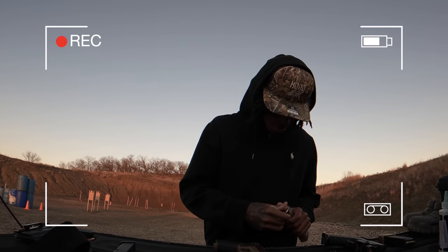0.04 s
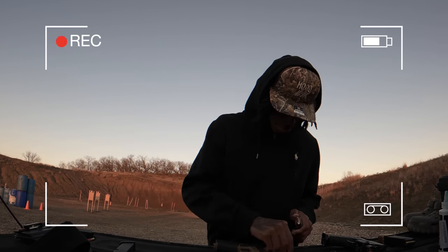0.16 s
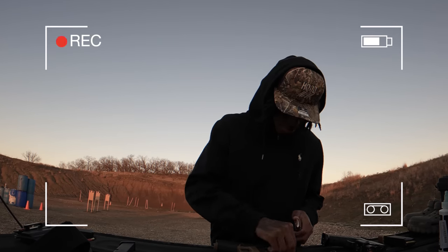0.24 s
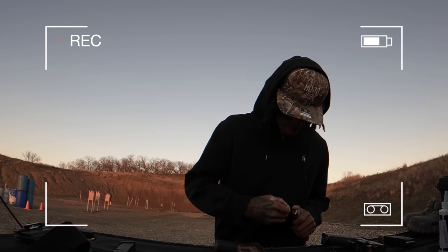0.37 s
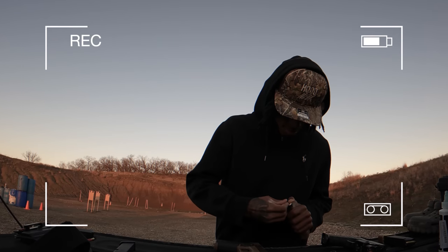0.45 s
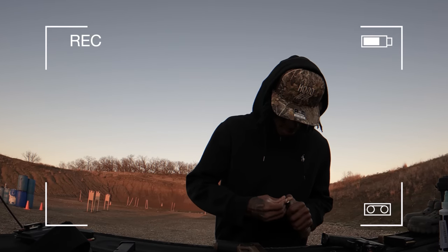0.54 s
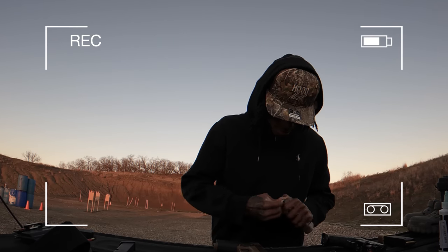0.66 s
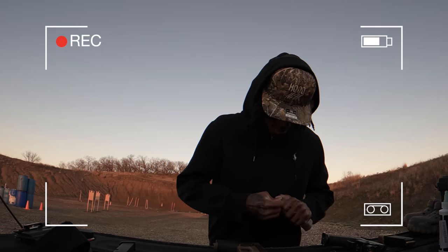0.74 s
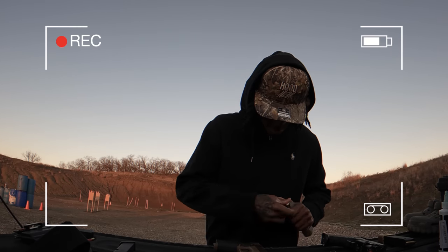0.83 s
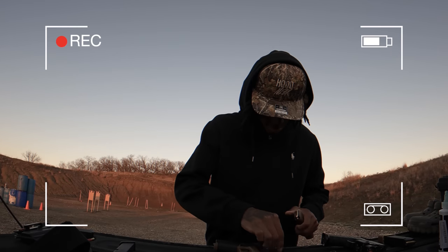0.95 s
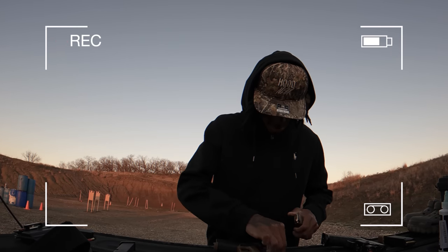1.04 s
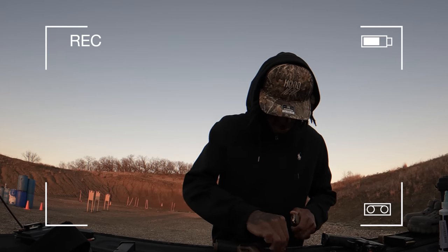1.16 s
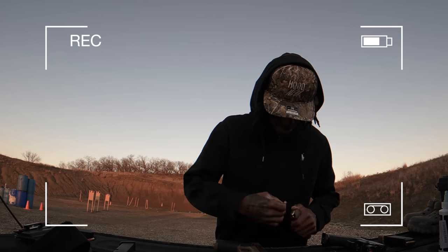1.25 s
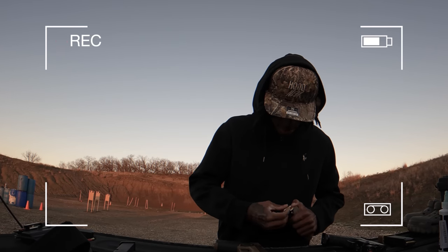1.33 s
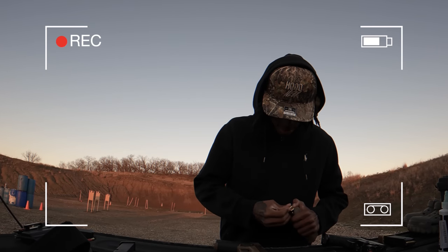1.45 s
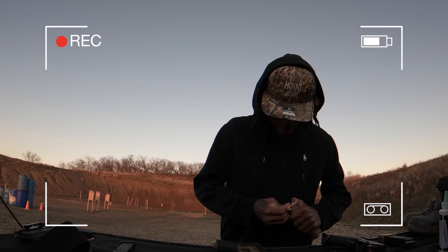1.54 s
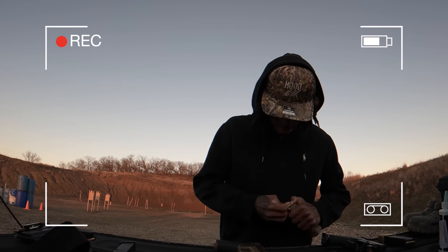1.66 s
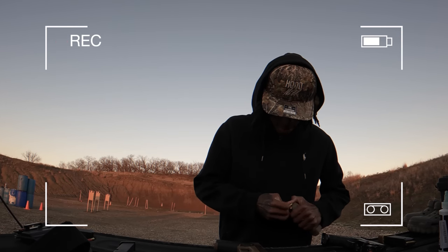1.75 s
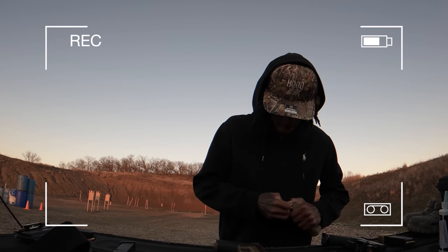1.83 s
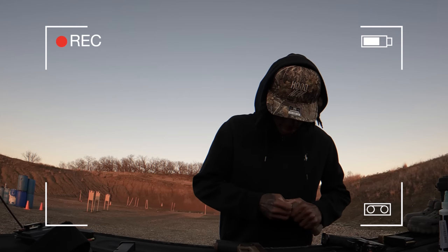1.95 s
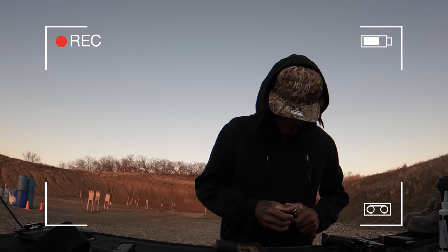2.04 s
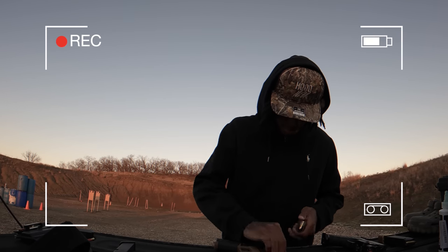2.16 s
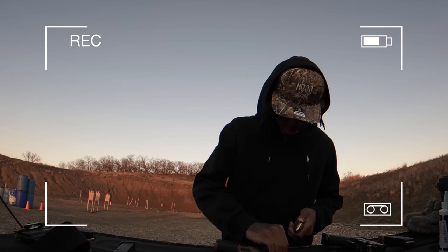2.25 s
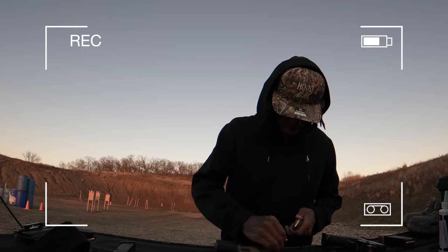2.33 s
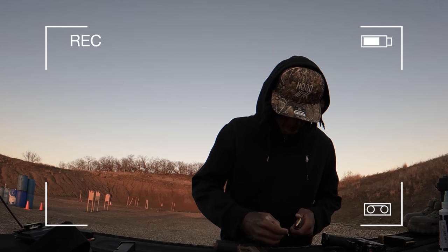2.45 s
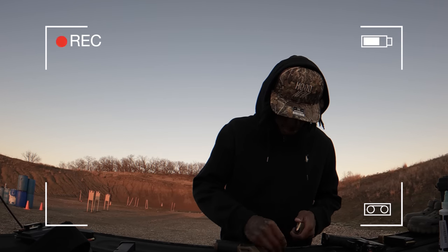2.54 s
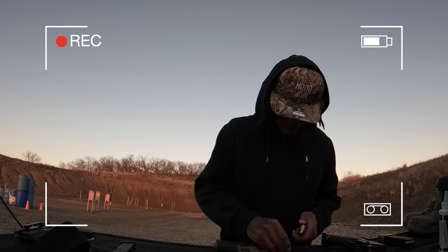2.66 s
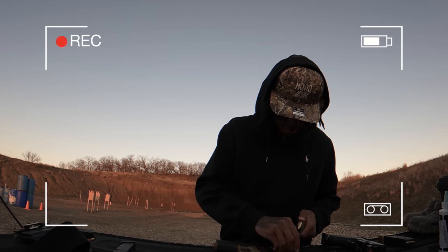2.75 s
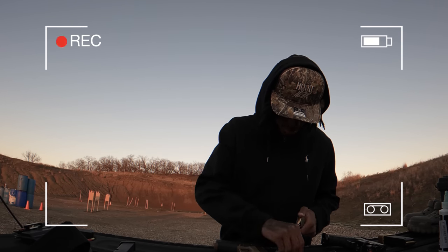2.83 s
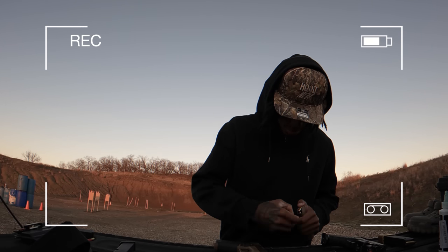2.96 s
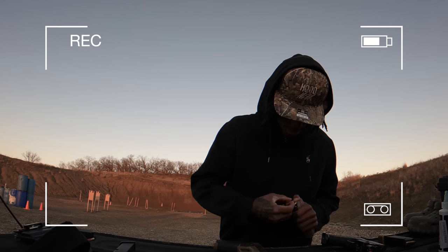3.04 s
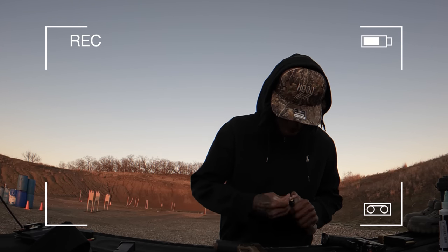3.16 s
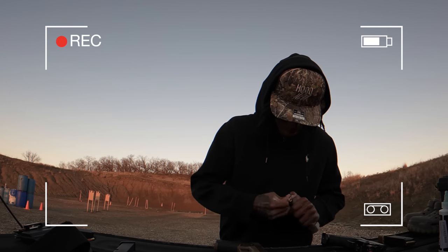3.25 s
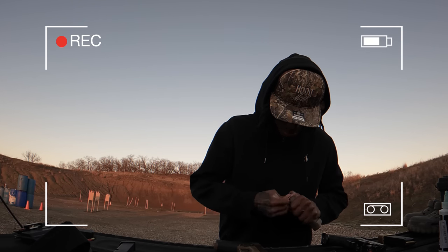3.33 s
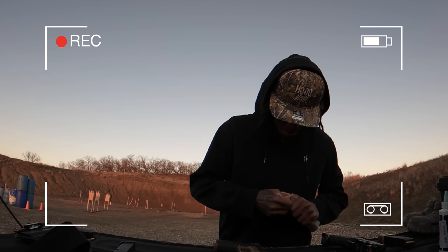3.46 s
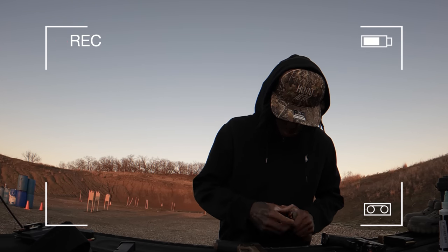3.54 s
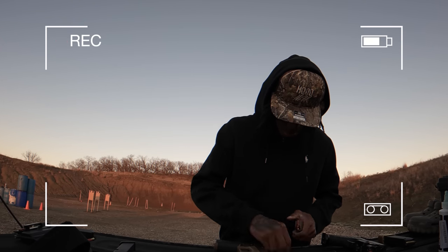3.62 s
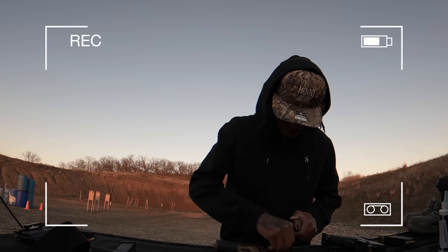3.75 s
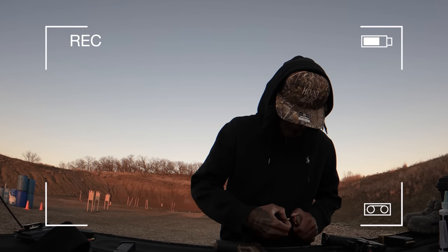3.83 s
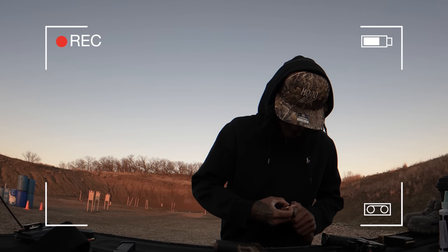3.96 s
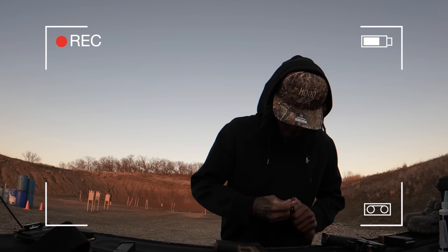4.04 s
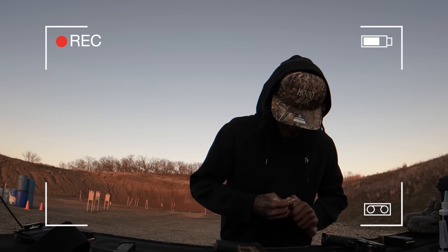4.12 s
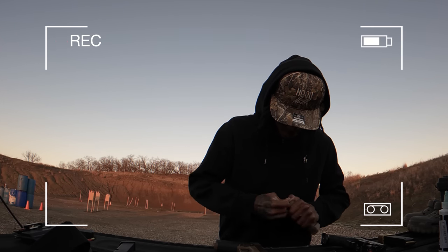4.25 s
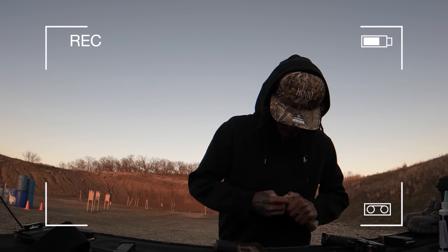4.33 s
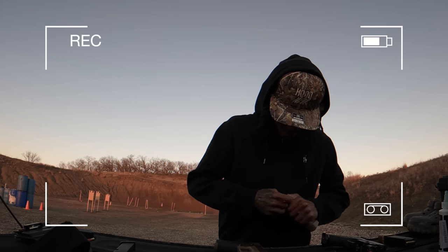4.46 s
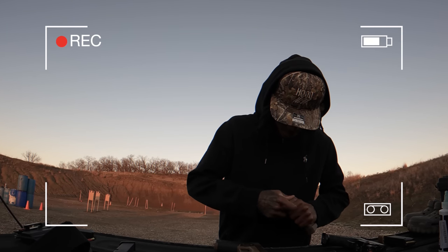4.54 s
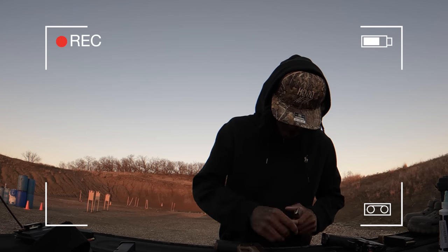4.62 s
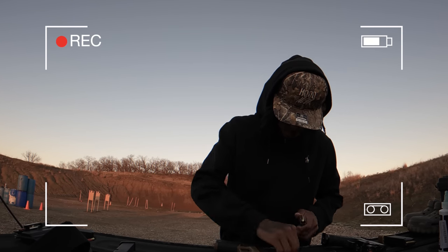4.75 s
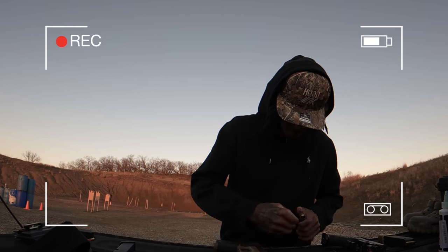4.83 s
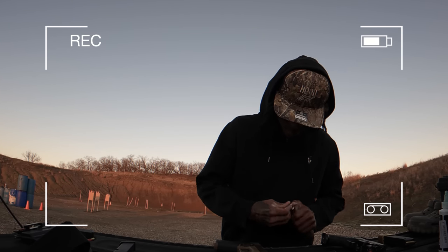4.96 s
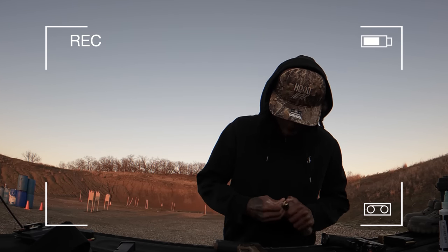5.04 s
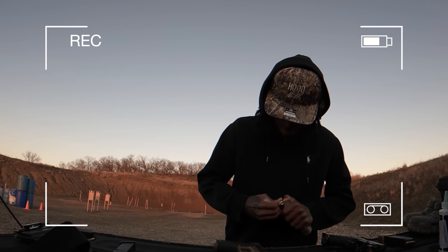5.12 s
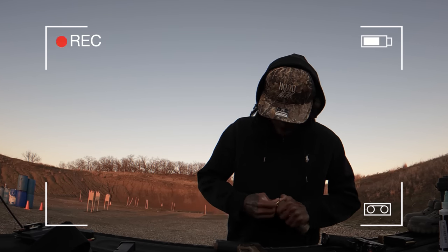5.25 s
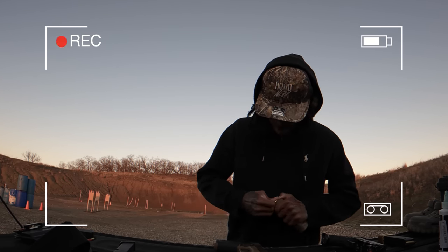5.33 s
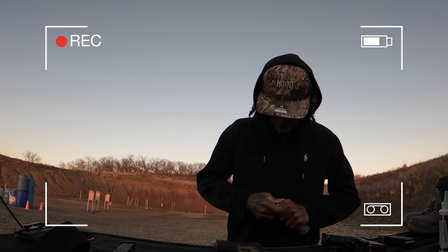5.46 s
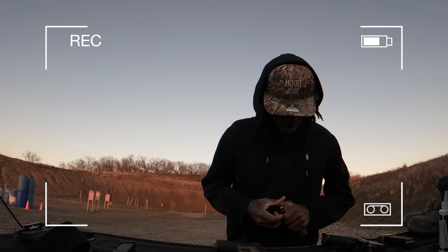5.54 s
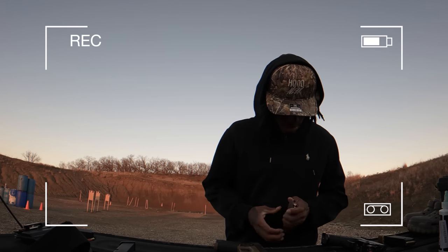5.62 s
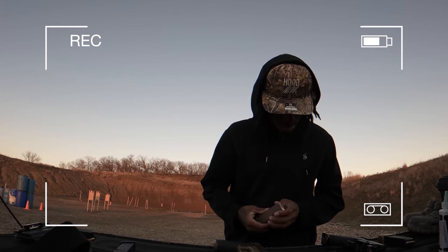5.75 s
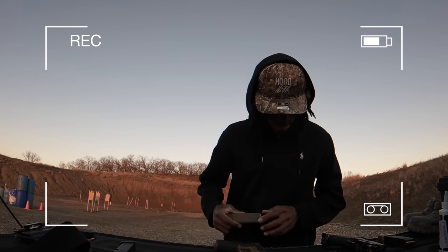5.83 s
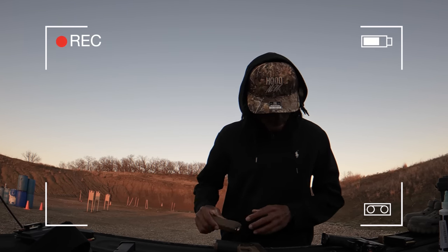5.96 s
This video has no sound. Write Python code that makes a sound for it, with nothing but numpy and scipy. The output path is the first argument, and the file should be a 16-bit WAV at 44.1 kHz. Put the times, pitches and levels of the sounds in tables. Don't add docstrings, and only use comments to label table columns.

```python
import sys
import numpy as np
from scipy import signal
from scipy.fft import rfft, irfft
from scipy.io import wavfile
from scipy.ndimage import uniform_filter1d

SR = 44100
rng = np.random.default_rng(int(sys.argv[2]) if len(sys.argv) > 2 else 0)


def voltage_ratio(decibels):
    exponent = np.asarray(decibels, float) / 20
    return 10 ** exponent


def materialize(psi):
    bounded = np.clip(np.atleast_2d(psi).T, -1, 1)
    quanta = np.round(bounded * 32767).astype(np.int16)
    wavfile.write(sys.argv[1], SR, quanta)


N = 264024

# [f/Hz, density/dB]
AIR_SPECTRUM = [(15, -1.5), (40, -5.5), (80, -4), (120, -11), (190, -19.5), (300, -20), (420, -31.5),
                (560, -42), (1000, -49), (1600, -56), (3000, -61.5), (7700, -70.5), (8300, -78),
                (15000, -93.5)]
AIR_DB = -46.5
# [arrival t/s, level/dB, stay/s]
CAR_PASSES = [
    (0.0, -71.5, 0.019),
    (0.4, -66.5, 0.14),
    (.98, -77, .1),
    (1.37, -77.5, 0.27),
    (1.95, -70, 0.031),
    (2.4, -78.5, 0.31),
    (3.35, -77.5, 0.32),
    (4.05, -68, 0.34),
    (5.35, -79.5, 0.095),
]
SWISH_RISE_DB_S, SWISH_FALL_DB_S, SWISH_FLOOR_DB = 216, 44, -89.5
# [f/Hz, density/dB]
TYRE_SPECTRUM = [(350, -37.5), (560, -5.5), (720, 2), (950, -3.5), (1300, -12), (1700, -20.5), (3000, -41),
                 (15000, -80.5)]
# [t/s, firing f/Hz, level/dB, upper orders above their mean/dB]
ENGINE_COURSE = [(0, 76.33, -54, 0), (.5, 76.52, -50.5, -2.5), (1, 75.94, -53.5, -4.5),
                 (1.599, 77.14, -55, -8), (2.299, 77.55, -61, 4), (2.999, 78.44, -65, 6.5),
                 (3.701, 77.9, -60, 2), (4.3, 77.68, -60.5, 6), (5., 78.08, -52.5, -2.5),
                 (5.5, 78.48, -54.5, 0.5), (5.99, 76.3, -55.5, -7)]
ENGINE_ORDERS_DB = [0.5, -7, 1, -7]
# [start t/s, end t/s]
CRICKET_PHRASES = [(0, .215), (.33, 1.02), (1.17, 1.48), (1.57, 2.09), (2.2, 2.47), (2.665, 2.9),
                   (3.0, 3.3), (3.43, 3.975), (4.08, 4.575), (4.665, 4.95), (5.03, 5.36), (5.46, 5.93)]
CRICKET_DB = -79.5
BANKS_DB, BANKS_T60_S = -26.5, 0.22
# [busiest t/s, level/dB]
FINGER_RUSTLES = [
    (0.78, -75.5),
    (2.08, -78.5),
    (2.269, -91),
    (3.57, -80),
    (4.671, -89.5),
    (5.45, -86),
    (5.9, -83.5),
]
RUSTLE_RISE_DB_S, RUSTLE_FALL_DB_S, RUSTLE_FLOOR_DB = 39, 42, -93
# [arrival t/s, level/dB, stay/s]
BOARD_SCUFFS = [(.25, -49, 0.1), (.33, -52, 0.044), (.69, -67, 0.009), (1.11, -51, 0.037),
                (1.17, -48.5, 0.056), (1.33, -58, 0.016), (1.4, -61, 0.025), (1.49, -62.5, 0.038),
                (1.56, -61, 0.062), (1.64, -69.5, 0.017), (1.76, -68, 0.013), (1.94, -61, .04),
                (2.215, -49, 0.075), (2.6, -44, 0.054), (2.7, -67, 0.068), (2.875, -47, 0.049),
                (2.95, -64.5, 0.011), (3.71, -47.5, 0.033), (4.765, -55, 0.023), (4.81, -62.5, 0.016)]
SCUFF_RISE_DB_S, SCUFF_FALL_DB_S, SCUFF_FLOOR_DB = 1196, 356.5, -100
# [f/Hz, density/dB]
SCUFF_SPECTRUM = [(200, -11), (400, 7), (700, 0.5), (1100, -7.5), (1600, -21), (2400, -24.5), (4000, -34),
                  (7000, -45.5), (15000, -81)]
# [t/s, thud/dB, panel above thud/dB, loose rounds above thud/dB, thud f/Hz]
BOX_KNOCKS = [(0.232, -24.5, -8, -25, 177), (0.247, -36.5, 10.5, -6, 236), (0.259, -26, -4, -13.5, 183),
              (0.294, -30.5, -2, -18, 198), (1.096, -26.5, -13.5, -25, 191), (1.118, -36.5, 3, -17, 290),
              (1.15, -31.5, 8, -4, 350), (1.16, -20, -1.5, -17, 210), (1.199, -33, 3, -30, 190),
              (2.207, -25.5, -11, -21.5, 290), (2.245, -30, -6.5, -25, 227), (2.266, -29, -2, -26, 166),
              (2.583, -12.5, -0.5, -0.5, 200), (2.591, -14.5, 3, -13, 330), (2.611, -27.5, 4, -34, 418),
              (2.621, -26, 1.5, -20, 400), (2.634, -27, 8.5, -14, 193), (2.651, -37, 2.5, -24, 300),
              (2.859, -34.5, -12, -28, 244), (2.866, -22, -5.5, -16.5, 169.7),
              (2.903, -35.5, -2.5, -14.5, 171), (3.701, -28.5, -1.5, -21.5, 202.9),
              (3.725, -32, -4, -16.5, 194), (3.739, -37, -0.5, -24, 182), (4.752, -29.5, -11, -18, 172),
              (4.764, -20.5, -8, -21, 258), (4.772, -24, -5.5, -23, 324)]
# [t/s, thud/dB, loose rounds above thud/dB, thud f/Hz]
BENCH_NUDGES = [(0.335, -32, -25, 369), (0.364, -32, -31, 305), (1.22, -34, -28, 300),
                (1.318, -34.5, -30, 300), (1.38, -32.5, -43, 194), (1.482, -40, -48, 300),
                (1.542, -43, -36, 230), (1.586, -40, -32, 222), (1.636, -42.5, -19, 148),
                (1.753, -42, -35, 290), (1.951, -42.5, -12, 152), (2.957, -40.5, -47, 236.6),
                (4.799, -48.5, -22, 208)]
NUDGE_PANEL_DB = -12
# [f/Hz, level/dB, t60/s]
BENCH_MODES = [(171, -5.5, 0.059), (200, -3, 0.11), (269, -3, 0.054), (300, -6.5, 0.1), (391, -7, 0.08)]
# [f/Hz, level/dB, t60/s]
PANEL_MODES = [(473, 7, 0.083), (560, 8.5, 0.16), (618, 9.5, 0.085), (720, 7.5, 0.069), (802, 9.5, 0.14),
               (873, 5.5, 0.03), (991, 3, .13), (1167, -1, .12), (1293, -8.5, .12), (1473, -6, 0.33),
               (1634, -16.5, 0.039), (1970, -9, 0.033), (2230, -7, .09), (2430, -7.5, .09)]
PANEL_DAMPING = 0.45
PANEL_SCATTER_DB, PANEL_DETUNE = 2.2, 0.02
# [f/Hz, density/dB]
ROUNDS_SPECTRUM = [(500, -24), (1300, 4), (2300, -4), (3300, -5), (4200, -14.5), (6000, -11), (7600, -18.5),
                   (8500, -39), (12000, -55), (15000, -58)]
RATTLE_S = 0.013
# [f/Hz, level/dB, t60/s]
MAGAZINE_MODES = [(1950, -15, 0.016), (2450, -12, 0.015), (3140, -10, 0.015), (4400, -14, 0.008),
                  (5450, -5.5, 0.0056), (6760, -13, 0.012)]
# [f/Hz, density/dB]
SCRAPE_SPECTRUM = [(1200, -24.5), (2000, -11.5), (3000, 4), (5000, 13.5), (7000, 4.5), (8500, -7),
                   (15000, -56)]
# [t/s, peak/dB, strongest ring f/Hz, shell knock/dB, edge/dB]
LIP_SNAPS = [(0.0114, -32, 2780, -17.5, -25), (0.0388, -35.5, 4900, -14.5, -11.5),
             (0.5347, -43.5, 1960, -17.5, -36), (0.6315, -39.5, 5530, -19.5, -24),
             (0.8116, -34, 5300, -33, -7.5), (0.815, -33, 3200, -27, -11), (0.8234, -37, 2070, -14.5, -18),
             (0.9088, -38, 4540, -9.5, -8.5), (1.1508, -37, 2380, -3, -11.5), (1.39, -62, 1970, -15, -29),
             (1.4077, -43, 4900, -21, -16), (1.41, -48, 1960, -17, -25), (1.9071, -32, 3100, -12, -22),
             (1.9164, -43, 1959, -15, -31), (3.1033, -45, 5540, -24, -26),
             (3.4181, -33.5, 4400, -22.5, -12.5), (3.5384, -44, 4280, -24, -32),
             (3.5558, -48, 1890, -9, -11), (4.3226, -42, 6750, -24, -22), (4.4842, -56.5, 2440, 6.5, -34),
             (4.5461, -45, 2670, -31, -33), (4.573, -44, 4640, -28, -36.5), (4.588, -27, 2760, -34, -35),
             (5.2954, -61, 4870, -4.5, 9.5), (5.4091, -45, 2450, -15, -38), (5.4844, -38.5, 2600, -29, -33),
             (5.5094, -35.5, 4800, -24, -28)]
# [t/s, peak/dB, strongest ring f/Hz, shell knock/dB]
BRASS_TICKS = [
    (1.522, -54.5, 2054, -7),
    (1.7275, -54, 5254, -6.5),
    (2.0834, -55.5, 1760, 2.5),
    (3.2572, -57, 4910, -22),
    (3.3573, -62, 5130, -9),
    (3.8407, -64.5, 1930, -6),
    (4.497, -54.5, 4760, -15),
    (5.566, -56.5, 4367, -27),
    (5.801, -53, 2050, -33),
]
TICK_EDGE_DB, SNAP_TAIL_S = -21, 0.0041
# [middle t/s, peak/dB, strongest ring f/Hz, edge/dB, half length/s]
BRASS_SLIDES = [(.008, -43, 2950, -26, 0.014), (0.032, -49, 4280, -31, 0.01),
                (0.549, -59.5, 1960, -25, 0.015), (0.587, -56, 6900, -32, 0.013),
                (0.634, -51, 4770, -21, 0.0085), (0.703, -55.5, 1500, -24, 0.015),
                (0.819, -46, 5200, -10, 0.0085), (0.841, -52, 1950, -32, 0.013),
                (0.868, -41.5, 3400, -25, 0.0046), (0.904, -46, 2830, -16, 0.0072),
                (2.022, -38.5, 4240, -22, 0.0058), (3.127, -62, 3940, -35.5, .012),
                (3.423, -41, 2920, -31, 0.0043), (3.54, -39, 5460, -31, 0.0067),
                (4.028, -58.5, 2200, -34, 0.0057), (4.317, -60, 5620, -20, 0.011),
                (4.49, -52, 2450, -20, 0.0041), (4.551, -57.5, 2450, -17, 0.018),
                (4.645, -53.5, 2920, -22.5, 0.012), (5.297, -50, 7680, -19, 0.0059),
                (5.499, -41, 2403, -17, 0.008), (5.799, -61.5, 6500, -19, 0.057)]
SLIDE_SHELL_DB = -20.5
# [middle t/s, peak/dB, strongest ring f/Hz]
BRASS_GRAZES = [(.485, -89, 5000), (.77, -59.5, 1850), (1.4, -62, 1970), (1.572, -64, 1780),
                (1.719, -61, 4400), (2.17, -71, 2850), (3.351, -67, 5520), (3.381, -64.5, 6000),
                (3.462, -60.5, 6000), (3.507, -62, 4400), (4.725, -64, 4000), (5.073, -73.5, 3492),
                (5.185, -68, 4300), (5.572, -58, 7500)]
GRAZE_SHELL_DB, GRAZE_EDGE_DB, GRAZE_S = -28, -17.5, 0.009
# [middle t/s, peak/dB, strongest ring f/Hz]
ROUND_JOSTLES = [
    (0.252, -41.5, 7500),
    (1.145, -44.5, 5950),
    (2.206, -48.5, 4270),
    (2.588, -29, 6000),
    (2.638, -44, 4480),
    (2.881, -51.5, 4040),
    (2.907, -57, 5500),
    (4.343, -52, 1250),
]
JOSTLE_SHELL_DB, JOSTLE_EDGE_DB, JOSTLE_S = -21, -37, 0.0023
# [t/s, step/dB]
SKIP = (5.91085, -42.5)


def unit(x):
    return x / np.sqrt(np.mean(x ** 2))


def peak(x, db):
    return x * voltage_ratio(db) / np.max(np.abs(x))


def colour(x, spectrum):
    hz, db = np.transpose(spectrum)
    f = np.maximum(np.arange(len(x) // 2 + 1) * SR / len(x), 1)
    gain = voltage_ratio(np.interp(np.log(f), np.log(hz), db))
    return irfft(rfft(x) * gain, len(x))


def band(x, lo_hz, hi_hz, order=2):
    return signal.sosfilt(signal.butter(order, [lo_hz, hi_hz], "bandpass", fs=SR, output="sos"), x)


def ring(x, modes, scatter_db, detune):
    out = 0
    chance = rng.standard_normal((len(modes), 2))
    for (hz, db, t60), (a, b) in zip(modes, chance):
        decay = np.log(1000) / (max(t60, 0.002) * SR)
        pole = np.exp(2j * np.pi * hz * (1 + detune * b) / SR - decay)
        out = out + voltage_ratio(db + scatter_db * a) * signal.lfilter([1], [1, -pole], x).imag
    return out


def add(out, x, s):
    i = int(s * SR)
    x = x[max(-i, 0):N - i]
    out[max(i, 0):max(i, 0) + len(x)] += x


def walk(rate):
    k = int(SR / rate)
    held = np.repeat(rng.standard_normal(N // k + 1), k)
    return 1.3 * uniform_filter1d(uniform_filter1d(held, k), k)[:N]


def swells(rows, rise_db_s, fall_db_s, floor_db):
    t = np.arange(N) / SR
    levels = []
    for s, db, hold in rows:
        rise = rise_db_s * np.maximum(s - t, 0)
        fall = fall_db_s * np.maximum(t - s - hold, 0)
        levels.append(np.maximum(db - rise - fall, floor_db))
    return np.max(levels, axis=0)


def air():
    out = 0
    for hz in 22 * 2. ** np.arange(10):
        octave = band(rng.standard_normal(N), hz / np.sqrt(2), hz * np.sqrt(2))
        out = out + voltage_ratio(2.4 * walk(4.1)) * octave
    return voltage_ratio(AIR_DB) * unit(colour(out, AIR_SPECTRUM))


def traffic():
    db = swells(CAR_PASSES, SWISH_RISE_DB_S, SWISH_FALL_DB_S, SWISH_FLOOR_DB)
    tyres = unit(colour(rng.standard_normal(N), TYRE_SPECTRUM))
    return voltage_ratio(db + 1.9 * walk(7.8) + 2.1 * walk(45)) * tyres


def engine():
    s, hz, db, upper_db = np.transpose(ENGINE_COURSE)
    t = np.arange(N) / SR
    phase = 2 * np.pi * np.cumsum(np.interp(t, s, hz) * (1 + 0.0032 * walk(5.4))) / SR
    waver_db = [2.5, 3.4, 1.2, 0.91]
    out = 0
    for k, order_db in enumerate(ENGINE_ORDERS_DB):
        level_db = np.interp(t, s, db + (k > 1) * upper_db) + order_db
        out = out + np.sqrt(2) * voltage_ratio(level_db + waver_db[k] * walk(11.0)) * np.sin((k + 1) * phase)
    return out


def cricket():
    t = np.arange(N) / SR
    on = sum(np.clip(np.minimum(t - a, b - t) / 0.017, 0, 1) for a, b in CRICKET_PHRASES)
    stroke = np.cumsum(50 * (1 + 0.048 * walk(11))) / SR % 1
    hz = 4780 * (1 + 0.11 * (0.5 - stroke) + 0.0047 * walk(85))
    tone = np.sin(2 * np.pi * np.cumsum(hz) / SR) * np.sin(np.pi * stroke) ** 2.3
    echo = np.roll(tone, int(0.011 * SR)) * voltage_ratio(-8 + 3 * walk(15))
    far = unit(band(rng.standard_normal(N), 4600, 4980))
    level = voltage_ratio(CRICKET_DB + 3 * walk(25) + 0.7 * walk(7))
    return level * on * (1.3 * (tone + echo) + 0.4 * far)


def banks(x):
    t = np.arange(16384) / SR
    wash = band(rng.standard_normal(len(t)), 300, 920, order=3)
    wash = wash * voltage_ratio(-60 * t / BANKS_T60_S) * np.minimum(t / 0.011, 1)
    return voltage_ratio(BANKS_DB) * signal.fftconvolve(x, wash / np.sqrt(np.sum(wash ** 2)))[:N]


def rustle():
    rows = [row + (0,) for row in FINGER_RUSTLES]
    db = swells(rows, RUSTLE_RISE_DB_S, RUSTLE_FALL_DB_S, RUSTLE_FLOOR_DB)
    grains = rng.standard_normal(N) * voltage_ratio(3.3 * walk(360) + 1.6 * walk(47))
    return voltage_ratio(db - 1.5) * unit(colour(grains, SCRAPE_SPECTRUM))


def scuff():
    db = swells(BOARD_SCUFFS, SCUFF_RISE_DB_S, SCUFF_FALL_DB_S, SCUFF_FLOOR_DB)
    grains = rng.standard_normal(N) * voltage_ratio(2.7 * walk(250) + 3.2 * walk(45))
    return voltage_ratio(db) * unit(colour(grains, SCUFF_SPECTRUM))


def bench():
    out, lead = np.zeros(N), 0.01
    t = np.arange(12288) / SR - lead
    panel_modes = [(f, g, t60 * PANEL_DAMPING) for f, g, t60 in PANEL_MODES]
    nudges = [(s, db, NUDGE_PANEL_DB, rounds_db, hz) for s, db, rounds_db, hz in BENCH_NUDGES]
    for s, db, panel_db, rounds_db, hz in sorted(BOX_KNOCKS + nudges):
        fade = np.exp(np.where(t < 0, t / 0.0014, -t / RATTLE_S))
        hits = rng.random(len(t)) < 2500 / SR
        bounces = hits * rng.standard_normal(len(t)) * fade * 0.65 * (t > 0)
        bounces[int(lead * SR)] = 1
        soft = np.convolve(bounces, np.hanning(int(0.0019 * SR)))[:len(t)]
        hard = np.convolve(bounces, np.hanning(int(0.0004 * SR)))[:len(t)]
        thud = band(ring(soft, BENCH_MODES + [(hz, 1.5, 0.05)], 1.4, 0.023), 160, 480, order=3)
        panel = band(ring(hard, panel_modes, PANEL_SCATTER_DB, PANEL_DETUNE), 400, 2800)
        chatter = rng.standard_normal(len(t)) * voltage_ratio(3.8 * rng.standard_normal(len(t) // 48).repeat(48))
        dull = band(chatter, 300, 2500, order=1)
        bright = (chatter - dull) * uniform_filter1d(fade ** 2, size=70)
        rounds = colour(dull * fade ** 0.75 + bright, ROUNDS_SPECTRUM)
        knock = peak(thud, db) + peak(panel, db + panel_db - 0.1) + peak(rounds, db + rounds_db - 0.1)
        add(out, knock, s - lead)
    return out


def grit(size):
    return rng.standard_normal(size) * voltage_ratio(4.9 * rng.standard_normal(size // 32).repeat(32))


def brass(drive, db, hz, shell_db, edge_db):
    case = ring(drive, MAGAZINE_MODES + [(hz, 4, 18 / hz)], 2.5, 0.015)
    body = peak(band(case, 1200, 6900), -1.35) + peak(colour(drive, SCRAPE_SPECTRUM), 0.8)
    shell = band(ring(drive, [(826, 9, 0.035), (1059, -13, 0.016)], 2, 0.043), 590, 910)
    edge = band(drive, 7500, 13000, order=3)
    return peak(body, db) + peak(shell, db + shell_db + 3.5) + peak(edge, db + edge_db - 0.1)


def snaps():
    out, t = np.zeros(N), np.arange(-4096, 4096) / SR
    ticks = [row + (TICK_EDGE_DB,) for row in BRASS_TICKS]
    for s, db, hz, shell_db, edge_db in sorted(LIP_SNAPS + ticks):
        blow = np.exp(-np.abs(t) / 0.0004) * rng.standard_normal(len(t)) * (t >= 0)
        trail = 0.24 * np.exp(-np.abs(t) / SNAP_TAIL_S) * grit(len(t))
        drive = blow + trail * np.exp(np.minimum(t, 0) / 0.002)
        add(out, brass(drive, db, hz, shell_db, edge_db), s + t[0])
    return out


def slides():
    out, t = np.zeros(N), np.arange(-4096, 4096) / SR
    rows = [(s, db, hz, SLIDE_SHELL_DB, edge_db, half) for s, db, hz, edge_db, half in BRASS_SLIDES]
    rows += [row + (GRAZE_SHELL_DB, GRAZE_EDGE_DB, GRAZE_S) for row in BRASS_GRAZES]
    rows += [row + (JOSTLE_SHELL_DB, JOSTLE_EDGE_DB, JOSTLE_S) for row in ROUND_JOSTLES]
    for s, db, hz, shell_db, edge_db, half in rows:
        swell = 1 / np.cosh(t / np.clip(half, 0.002, 0.05))
        drive = swell * grit(len(t)) * np.hanning(len(t))
        add(out, brass(drive, db, hz, shell_db, edge_db), s + t[0])
    return out


def scene():
    knocks = bench()
    background = air() + traffic() + engine() + cricket() + banks(knocks)
    hands = rustle() + scuff()
    return (background + hands + knocks + snaps() + slides())[None]


def low_pass(x):
    return signal.sosfilt(signal.butter(12, 15630, fs=SR, output="sos"), x)


def record(dry):
    skip_s, skip_db = SKIP
    after = np.arange(N) / SR - skip_s
    step = voltage_ratio(skip_db) * (after > 0) * np.exp(-np.abs(after) / 0.003)
    rounded = np.tanh(1.401 * dry) / 1.387
    return low_pass(rounded + step)


dry = scene()
out = record(dry)
materialize(out)
```